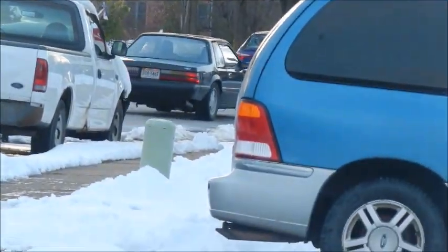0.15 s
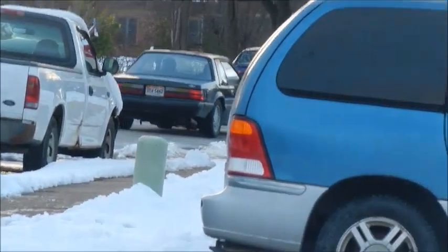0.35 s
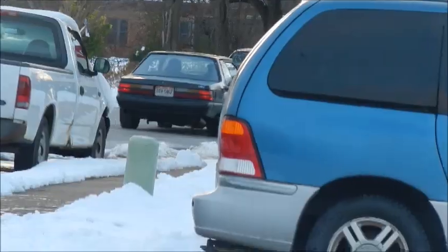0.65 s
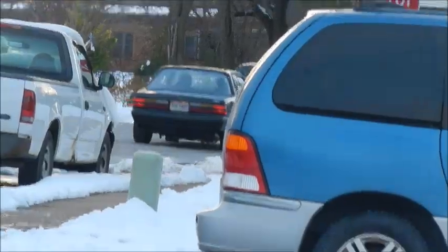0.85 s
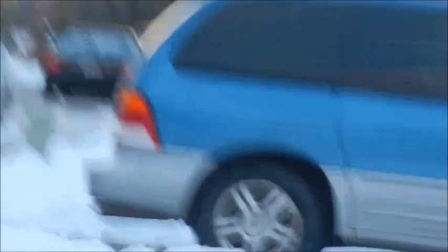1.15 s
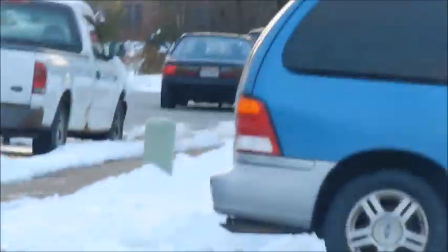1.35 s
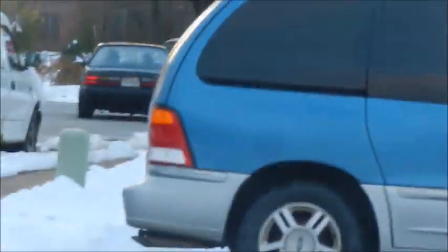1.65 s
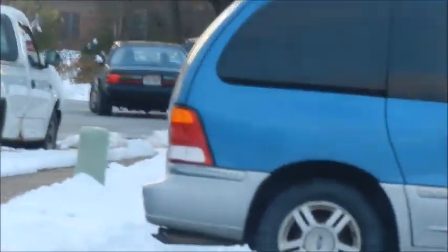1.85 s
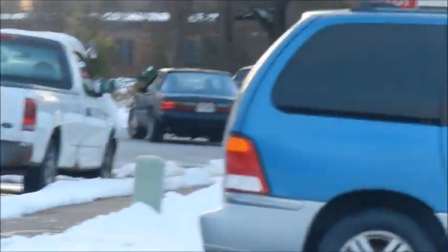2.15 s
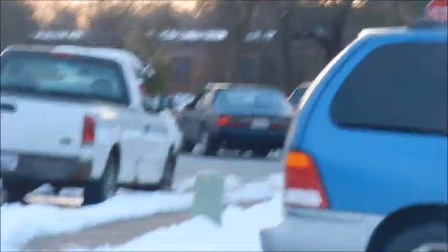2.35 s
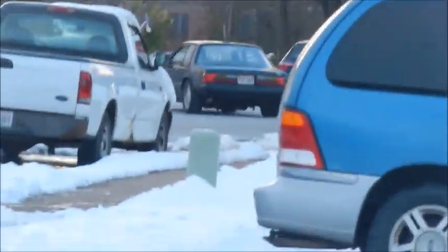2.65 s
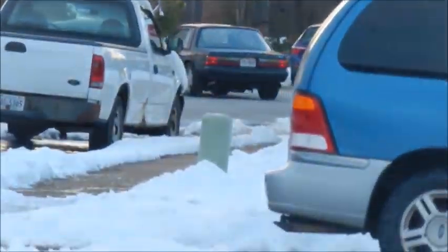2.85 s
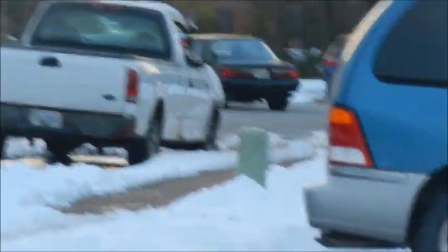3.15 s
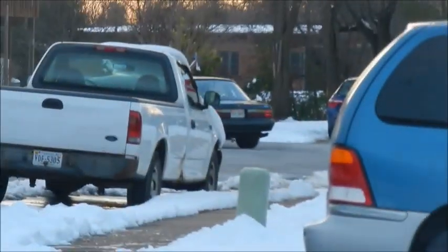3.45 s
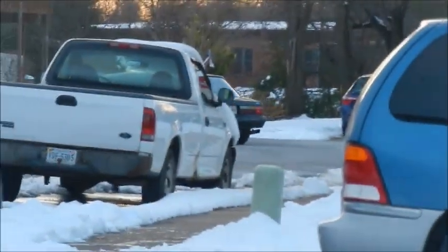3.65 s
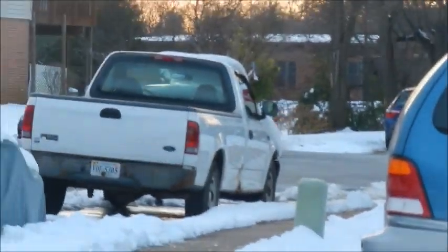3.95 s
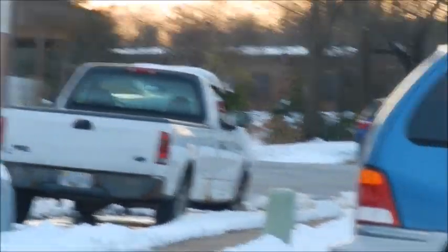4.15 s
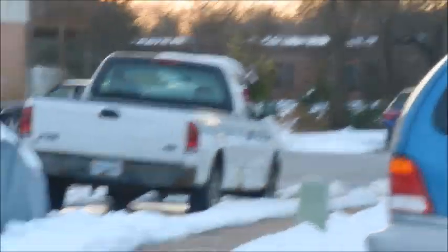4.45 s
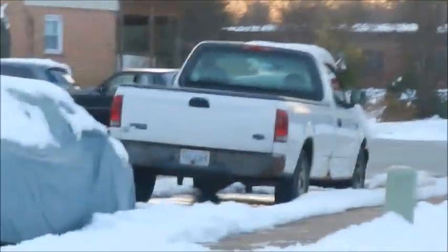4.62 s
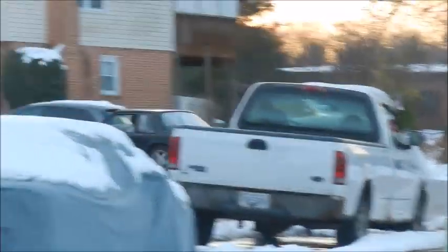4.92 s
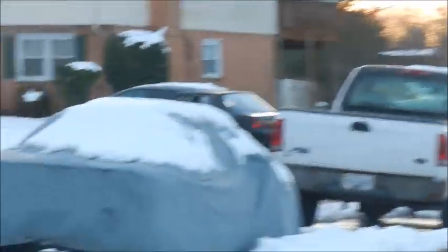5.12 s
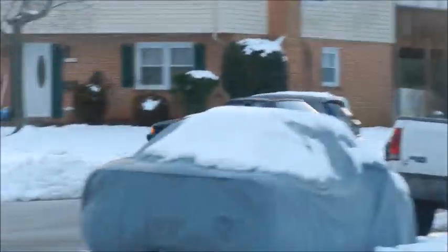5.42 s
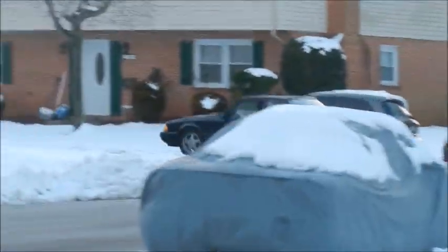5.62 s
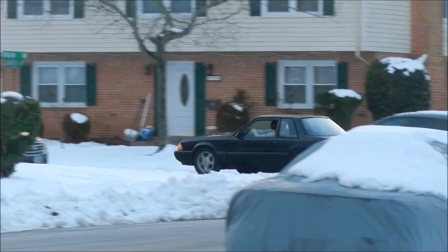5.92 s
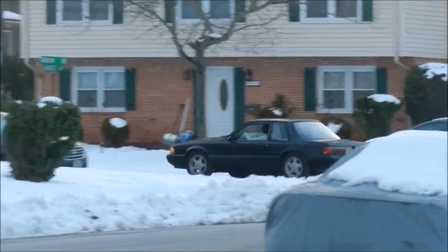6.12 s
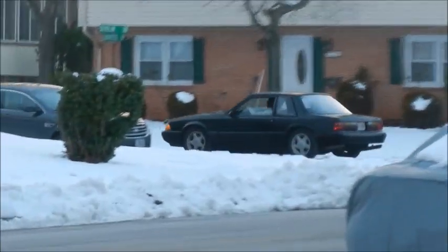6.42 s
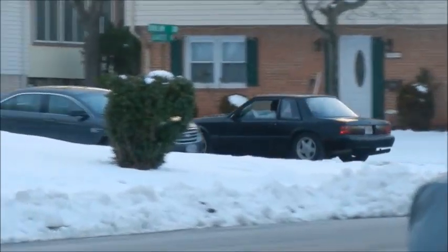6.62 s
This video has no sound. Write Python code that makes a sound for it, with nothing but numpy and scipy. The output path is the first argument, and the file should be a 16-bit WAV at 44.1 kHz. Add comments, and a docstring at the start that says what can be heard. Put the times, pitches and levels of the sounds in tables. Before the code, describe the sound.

Outdoors on a snowy residential street, a dark car rolls by at low speed with a lumpy, chugging eight-cylinder exhaust. Sharp little clicks and rubs come from a hand on the camera. The engine smooths, climbs steadily in pitch and swells into a deep resonant boom with rushing gas and raspy hiss, then the driver lifts off and the note falls. Faint street hiss lies beneath, and the car sits louder on the right.

```python
"""An uneven, loping eight-cylinder exhaust comes first; a faint hum rises through it and is gone.
The car rolls round a street corner, pulls away and lifts off: its firing note climbs into the exhaust boom.
Multiples of the engine cycle make note and burble; noise pulsed by the firings makes gas rush and rasping hiss.
Close by, a hand rubs and ticks on a camera, as uneven noise strokes and short struck resonances.
Steady banded noise is the faint hiss of the street."""
import sys
import numpy as np
from scipy import signal
from scipy.io import wavfile

SR = 44100
rng = np.random.default_rng(int(sys.argv[2]) if len(sys.argv) > 2 else 0)


def file_out(sig):
    """Save sig as 16-bit WAV at sys.argv[1]."""
    # one column per channel
    cols = np.atleast_2d(sig).T
    # limit, then scale
    lim = np.clip(cols, -1, 1)
    pcm = np.round(lim * 32767).astype(np.int16)
    wavfile.write(sys.argv[1], SR, pcm)


N = 298907   # length in samples


def from_db(db):
    """Decibels to amplitude gain."""
    return 10 ** (np.asarray(db) / 20)


def rms_one(x):
    """Scale a signal to rms 1."""
    return x / np.sqrt(np.mean(np.abs(x) ** 2) + 1e-20)


def in_time(rows):
    """Each column of a curve, one value a sample."""
    s, *columns = np.transpose(rows)
    return [np.interp(np.arange(N) / SR, s, c) for c in columns]


def at_hz(points, hz):
    """Each column of a spectrum, read on a log-frequency axis."""
    knots, *columns = np.transpose(points)
    return [np.interp(np.log(hz), np.log(knots), c) for c in columns]


def drift(rate_hz):
    """Slow random wandering with rms 1: noise through a two-pole lowpass, made at SR / 40."""
    r = np.exp(-80 * np.pi * rate_hz / SR)
    white = rng.standard_normal(N // 40 + 2002)
    slow = signal.lfilter([1], [1, -2 * r, r * r], white)[2000:]   # skip the filter's start
    return np.interp(np.arange(N) / 40, np.arange(len(slow)), rms_one(slow))


def resonance(x, hz, width_hz):
    """Two-pole resonance with gain 1 on top."""
    r = np.exp(-np.pi * width_hz / SR)
    zeros = np.array([1, 0, -1]) * (1 - r * r) / 2
    poles = [1, -2 * r * np.cos(2 * np.pi * hz / SR), r * r]
    return signal.lfilter(zeros, poles, x + 1e-18)


def pan(db):
    """Left and right gains for a level difference, positive to the left."""
    return from_db(np.array([[db], [-db]]) / 2)


def banded_noise(spectrum, ports, patchy_db):
    """Half-octave bands of stereo noise with their own flicker, likeness and balance; rms 1 in the middle."""
    out, edges = 0, 24 * 2 ** np.arange(0, 9.6, .5)
    white = rng.standard_normal((2, 2, N))
    for k, (low, high) in enumerate(zip(edges, edges[1:])):
        band_pass = signal.butter(2, [low, high], "band", fs=SR, output="sos")
        mid, side = signal.sosfilt(band_pass, white[k % 2])   # neighbouring bands use separate noise
        hz = np.sqrt(low * high)
        alike, balance_db = at_hz(ports, hz)
        alike = np.clip(alike, -.99, .99)
        stereo = np.sqrt(1 + alike) * mid + np.sqrt(1 - alike) * side * [[1], [-1]]
        flicker_db = patchy_db * drift(16.0)
        out = out + pan(balance_db) * stereo * from_db(at_hz(spectrum, hz)[0] + flicker_db)
    return out / np.std(out.mean(axis=0))


# engine speed: time_s, firing_rate_hz (firings per second)
ENGINE_SPEED = [(0, 84), (.2, 87), (.5, 84.5), (.8, 81), (1.0, 77.5), (1.2, 77), (1.4, 73.5), (1.75, 76.5),
                (2.05, 72.3), (2.25, 79), (2.5, 79.7), (2.68, 85.2), (2.95, 87.3), (3.25, 93), (3.55, 95.2),
                (3.8, 99.7), (4.0, 102.4), (4.2, 105.9), (4.6, 114.6), (5.05, 123.9), (5.22, 126.1),
                (5.4, 131.6), (5.58, 134.4), (5.76, 139.4), (5.95, 141.7), (6.33, 147.2), (6.5, 138.6),
                (6.62, 130), (6.7, 119), (6.78, 118)]
# the driver's foot and the unevenness of the cylinders: time_s, throttle (0-1), burble_db (before pipe colour)
THROTTLE_AND_BURBLE = [(0, 0.1, -24.5), (.8, 0.04, -32.5), (1.35, 0.12, -26.5), (1.7, 0.26, -26),
                       (3.2, 0.13, -28), (3.8, 0.5, -30), (4.5, 0.67, -24.5), (4.87, 0.57, -25),
                       (5.08, 0.84, -25.5), (5.3, 0.96, -20), (5.6, 0.88, -36), (6.35, 0.86, -29),
                       (6.48, 0.26, -24), (6.58, 0.25, -24), (6.78, 0.5, -26.5)]
WEAK_FIRING_S = 3.748   # one cylinder fires weakly here, and once in every cycle before and after


def engine():
    """Eight firings make one engine cycle; the running cycle count drives every pulse of the car."""
    cycle_hz = in_time(ENGINE_SPEED)[0] / 8
    cycle = np.cumsum(cycle_hz) / SR
    cycle = cycle - np.interp(WEAK_FIRING_S, np.arange(N) / SR, cycle)
    throttle, burble_db = in_time(THROTTLE_AND_BURBLE)
    return cycle, cycle_hz, np.clip(throttle, 0, 1), burble_db


# strength of the firing note ahead of the lope: time_s, level_db
FIRING_NOTE = [(0, -41.5), (.2, -46), (.5, -48), (.8, -50.5), (1.0, -42.5), (1.15, -47.5), (1.38, -41),
               (1.6, -49), (1.85, -31.5), (2.08, -44), (2.25, -39), (2.6, -37.5), (3.3, -37.5),
               (3.95, -36.5), (4.2, -39.5), (4.55, -33.5), (4.8, -34), (5.0, -29), (5.2, -25.5),
               (5.4, -24.5), (5.6, -24.5), (5.95, -24), (6.28, -28), (6.42, -30), (6.6, -29), (6.7, -43.5),
               (6.78, -33)]
# relative strength of the other multiples of the cycle (the eighth is set by FIRING_NOTE): multiple, level_db
CYCLE_MULTIPLES = [(3, -22), (4, -13), (5, -13.5), (6, -14), (7, -21), (8, 0), (9, -23), (10, -6.5),
                   (11, -15), (12, -20), (13, -17), (14, -17), (15, -24), (16, -20.5), (17, -31), (18, -29),
                   (19, -40), (20, -33), (21, -32), (22, -24.5), (23, -29), (24, -22), (25, -27), (26, -32),
                   (27, -27.5), (28, -30), (29, -35), (30, -26), (32, -24), (34, -38), (36, -34), (38, -27),
                   (40, -26), (42, -36), (44, -38), (46, -27), (48, -21), (50, -33)]
# boom response of pipes and mufflers: pitch_hz, gain_db
PIPE_LOW = [(25, -34), (45, -24), (52, -22), (58, -12.5), (63, -12.5), (69, -13), (77, -13), (92, -18),
            (105, -17), (118, -6), (128, -3), (140, 0), (149, -13.5), (157, -41), (178, -33)]
# upper response of pipes and mufflers: pitch_hz, gain_db
PIPE_HIGH = [(215, -25), (228, -16), (239, -1), (250, -.5), (264, 1.5), (290, -3), (320, -18), (345, -14),
             (372, 4), (400, -2), (440, -6), (470, -12), (505, -3), (570, -19), (640, -12), (700, -15),
             (765, -8), (850, -16), (1000, -17)]
RASP_DB, RASP_THROTTLE_DB = -46, 18.5   # upper lines before pipe colour, throttle shut; gain at full throttle
RASP_ROUGH, RASP_FADE_DB, RASP_FADE_HZ = .17, 1.6, 2.2   # upper lines flutter, and swell and fade one by one
STUMBLE_ROUGH, STEADY_AT_S, STEADYING_S = 0.37, 3.27, 0.84   # firings stumble until the engine is under load


def exhaust(cycle, cycle_hz, throttle, burble_db, note_rough, burble_rough):
    """Every multiple of the engine cycle sweeps through the pipe response; the eighth is the firing note."""
    rasp_db = RASP_DB + RASP_THROTTLE_DB * throttle
    stumble = STUMBLE_ROUGH * np.clip((STEADY_AT_S - np.arange(N) / SR) / STEADYING_S, 0, 1)
    multiples, strengths_db = np.transpose(CYCLE_MULTIPLES)
    boom, rest = 0, 0
    for k in range(3, 57):
        hz = k * cycle_hz
        upper = np.clip((hz - 160) / 70, 0, 1)   # sharper pulses under load feed the upper resonances
        if k == 8:
            level_db, rough = in_time(FIRING_NOTE)[0], note_rough + stumble
        else:
            pipe_db = at_hz(PIPE_LOW + PIPE_HIGH, hz)[0]
            colour_db = np.interp(k, np.round(multiples), strengths_db) + pipe_db
            fading_rasp_db = rasp_db + RASP_FADE_DB * drift(RASP_FADE_HZ)
            level_db = (1 - upper) * burble_db + upper * fading_rasp_db + colour_db
            rough = (1 - upper) * burble_rough + upper * RASP_ROUGH + stumble
        # no two cycles burn alike, so each line wanders in strength and phase; its rms is kept
        wander = 1 + rough * (drift(6) + 1j * drift(6))
        wander = wander * np.sqrt(2 / (1 + 2 * rough ** 2))
        # the weak cylinder's multiples fall together against the firing note and cut one gap a cycle
        scatter = rng.random()
        turn = 0 if k == 8 else .5 if 8 < k < 15 else scatter
        line = from_db(level_db) * wander * np.exp(2j * np.pi * (k * cycle + turn))
        in_boom = np.clip((hz - 95) / 15, 0, 1) * (1 - upper)
        boom = boom + in_boom * line
        rest = rest + (1 - in_boom) * line
    return np.real(rest + lope(boom))


# single strong chugs of the loping engine: peak_s, peak_db, ring_hz
LOPING_CHUGS = [(0.178, -38, 129), (0.269, -47, 123), (0.377, -45, 128), (0.442, -38, 122),
                (.562, -32, 129), (0.698, -38.5, 125), (.758, -36, 125.4), (.889, -34, 119),
                (.956, -38.5, 119), (1.069, -34, 131), (1.265, -32, 121), (1.404, -36.5, 136),
                (1.473, -32.5, 121), (1.614, -39.5, 130), (1.685, -33, 125), (1.791, -34.5, 123),
                (1.896, -33, 122), (2.001, -40, 120), (2.115, -35, 116), (2.219, -40.5, 121)]
LOPE_END_S, LOPE_FADE_S, LOPE_SAG_DB, CHUG_WIDTH_S = 2.8, 0.24, -3, 0.027


def lope(boom):
    """At low speed the boom sags and each chug makes the muffler swell and ring; the sag then fades out."""
    t = np.arange(N) / SR
    sag = from_db(LOPE_SAG_DB * np.clip((LOPE_END_S - t) / LOPE_FADE_S, 0, 1))
    chugs = 0
    for s, db, hz in LOPING_CHUGS:
        swell = np.exp(-((t - s) / CHUG_WIDTH_S) ** 2)
        chugs = chugs + from_db(db) * swell * np.cos(2 * np.pi * hz * (t - s))
    return sag * boom + chugs


NOTE_PAN_DB = -9.6   # left minus right


def from_car(x):
    """Two microphone ports hear the car in opposite polarity, louder on the right; the middle keeps the level."""
    ports = pan(NOTE_PAN_DB) * [[-1], [1]]
    return x * ports / ports.mean()


# colour of the gas rush: pitch_hz, relative density_db (per Hz)
RUSH_SPECTRUM = [(30, -7.5), (70, 7), (130, 4), (190, -1.5), (260, 2.5), (400, -5), (570, -2), (800, -7),
                 (1150, -5.5), (1650, -17), (2100, -7.5), (3000, -24), (5000, -31), (12000, -44)]
# how the two ports hear the car's noise: pitch_hz, left_right_likeness (-1 to 1), left_minus_right_db
CAR_PORTS = [(60, -0.44, -8), (248, -0.56, -9), (486, -0.98, -10), (1000, -0.83, -9), (2020, -0.65, -6.5),
             (4240, -0.43, -1.5), (12000, -0.56, 0)]
# tailpipe resonances added to the rush: pitch_hz, width_hz, gain_db
TAILPIPE_MODES = [(378, 55, -8), (500, 40, -7), (765, 50, -5), (930, 120, -10)]
IDLE_HZ = 77   # firing rate when rolling slowly
RUSH_IDLE_DB, RUSH_DB_PER_OCTAVE, RUSH_THROTTLE_DB = -52, 3, 3   # before the tailpipes ring
CORNER_S, CORNER_WIDTH_S, CORNER_DB = 4.32, 0.64, 2   # swells a little as the car swings out of the corner


def rush(cycle, cycle_hz, throttle, throb):
    """Gas leaves the tailpipes in a puff at each firing and rings in them, louder with speed and throttle."""
    octaves = np.log2(8 * cycle_hz / IDLE_HZ)
    corner = np.exp(-((np.arange(N) / SR - CORNER_S) / CORNER_WIDTH_S) ** 2)
    engine_db = RUSH_DB_PER_OCTAVE * octaves + RUSH_THROTTLE_DB * throttle
    level_db = RUSH_IDLE_DB + engine_db + CORNER_DB * corner
    puffs = 1 + throb * np.cos(2 * np.pi * 8 * cycle)
    gas = from_db(level_db) * puffs * banded_noise(RUSH_SPECTRUM, CAR_PORTS, patchy_db=1.5)
    return gas + sum(from_db(db) * resonance(gas, hz, width) for hz, width, db in TAILPIPE_MODES)


# the rasping hiss, which comes in as the car pulls round the corner: time_s, level_db
HISS_LEVEL = [(0, -73), (1.95, -85), (2.22, -61), (2.4, -68), (2.8, -61.5), (3.7, -63), (4.4, -60),
              (4.95, -57.5), (5.4, -60), (6.3, -62.5), (6.78, -80)]
# resonances of the hiss: pitch_hz, width_hz, relative gain_db
HISS_RESONANCES = [(1450, 350, 0), (1730, 230, 2.5), (3250, 600, -11)]


def hiss(cycle, throb, grain_db):
    """Noise rings in a few narrow resonances, in one puff of uneven strength per firing."""
    firings = 8 * cycle
    strength = from_db(grain_db * rng.standard_normal(1000))[firings.astype(int)]
    puffs = strength * (1 - throb * np.cos(2 * np.pi * firings))
    source = banded_noise([(1000, 0), (4000, 0)], CAR_PORTS, patchy_db=1.0) * puffs
    rung = 0
    for k, (hz, width, db) in enumerate(HISS_RESONANCES):
        twice = resonance(resonance(source, hz, width), hz, width)
        rung = rung + (-1) ** k * from_db(db) * twice   # alternating signs join neighbours into one band
    return from_db(in_time(HISS_LEVEL)[0]) * rung / np.std(rung.mean(axis=0))


# a faint hum that rises and is gone: time_s, pitch_hz, level_db (before its waver)
HUM_GLIDE = [(0, 233.4, -59), (.53, 242.5, -59.5), (.6, 291.4, -56), (.75, 292, -120)]


def hum(rough):
    """One gliding sine whose strength wavers at random."""
    hz, db = in_time(HUM_GLIDE)
    waver = 1 + rough * drift(4.9)
    return from_db(db) * waver * np.sqrt(2) * np.sin(2 * np.pi * np.cumsum(hz) / SR)


# ticks of the camera body, levels before panning:
# start_s, crack_peak_db, crack_top_hz, knock_hz, knock_db, ring_hz, ring_db, ring_t60_s
CAMERA_TICKS = [(1.0465, -40, 15000, 1300, -50, 2200, -54, .02),
                (1.0915, -38, 11000, 1300, -48, 2700, -48, .02),
                (1.1105, -34, 15000, 1300, -52, 2200, -49, .02),
                (1.124, -32, 15000, 1900, -36, 2200, -42, .025),
                (1.129, -39, 9000, 1900, -39, 2700, -48, .02),
                (1.1597, -39, 9000, 2000, -38, 2180, -45, .02),
                (1.2665, -27, 15500, 650, -31, 2300, -38, .035),
                (1.4957, -25.5, 11400, 1350, -42, 4200, -41, .025),
                (4.481, -40, 15000, 1200, -46, 1200, -50, .02),
                (4.535, -43, 11000, 2500, -41, 2400, -41.5, .09),
                (5.691, -35, 13000, 1000, -38, 2950, -37.5, .05),
                (6.322, -44, 6000, 800, -32, 1200, -42, .04)]
# modes of the camera shell: pitch_hz, width_hz, relative gain_db
SHELL_MODES = [(1400, 400, 1), (2900, 650, 4), (4600, 650, 0), (6800, 1800, -7), (10600, 2200, -2),
               (13500, 2500, -9)]
TICK_PAN_DB = -4.0   # left minus right
KNOCK_CYCLES = 5   # the knock falls 60 dB in this many cycles


def ticks(crack_lag_s, tail_db, tail_s, ring_width_hz):
    """A sharp crack through the camera shell with a short rattle, a dull knock and one narrow ring."""
    out, t = np.zeros((2, N)), np.arange(SR // 8) / SR
    snap = np.zeros((2, len(t)))
    snap[0, 0] = snap[1, round(crack_lag_s * SR)] = 1   # the right hears it a moment later
    for s, crack_db, top_hz, knock_hz, knock_db, ring_hz, ring_db, t60 in CAMERA_TICKS:
        grit = rng.standard_normal((2, len(t)))
        contact = snap + grit * from_db(tail_db) * np.exp(-t / tail_s)
        crack = 0
        for k, (hz, width, db) in enumerate(SHELL_MODES):
            crack = crack + (-1) ** k * from_db(db) * resonance(contact, hz, width)
        low_pass = signal.butter(8, min(top_hz, CUTOFF_HZ), fs=SR, output="sos")
        crack = signal.sosfilt(low_pass, crack)
        crack = from_db(crack_db) * crack / np.abs(crack).max()
        knock = from_db(-60 * t * knock_hz / KNOCK_CYCLES) * np.cos(2 * np.pi * knock_hz * t)
        ring = resonance(resonance(grit, ring_hz, ring_width_hz), ring_hz, ring_width_hz)
        ring = rms_one(ring) * from_db(-60 * t / t60)
        at = round(s * SR)
        out[:, at:at + len(t)] += crack + from_db(knock_db) * knock + from_db(ring_db) * ring
    return out * pan(TICK_PAN_DB)


# strokes of the hand on the camera: start_s, length_s, level_db (before grain and snags)
RUB_STROKES = [(1.062, 0.13, -63), (1.1, 0.018, -65), (1.174, 0.024, -57), (1.264, 0.0092, -50),
               (1.486, .014, -54.5), (1.854, 0.033, -66), (2.385, 0.14, -65.5), (4.067, 0.12, -65),
               (4.79, 0.052, -62.5), (5.453, 0.028, -63), (6.29, 0.026, -64), (6.34, 0.13, -57.5),
               (6.506, 0.14, -57.5)]
# colour of the rubbing: pitch_hz, relative density_db (per Hz)
RUB_SPECTRUM = [(800, -2.5), (2200, 4.5), (4500, -2.5), (8000, 0.5), (11500, -3), (15500, -1)]
# stereo image of the rubbing: pitch_hz, left_right_likeness (-1 to 1), left_minus_right_db
RUB_IMAGE = [(1000, -0.28, -12.5), (4000, -0.45, -1.5), (12200, -0.17, 3.5)]
RUB_ATTACK_DB_PER_S, RUB_RELEASE_DB_PER_S = 380, 402
SNAGS_PER_S, SNAG_S, SNAG_DB = 60, .001, 6   # mean rate, decay time, gain of the added burst before a random 0-1


def rubbing(grain_db, grain_hz, stutter_db, stutter_hz):
    """Skin slides in tiny uneven slips and now and then snags; each stroke rises, holds and dies away."""
    slide, t = banded_noise(RUB_SPECTRUM, RUB_IMAGE, patchy_db=.5), np.arange(N) / SR
    strokes = 0
    for s, length, db in RUB_STROKES:
        rise_db = RUB_ATTACK_DB_PER_S * np.maximum(s - t, 0)
        fall_db = RUB_RELEASE_DB_PER_S * np.maximum(t - s - length, 0)
        strokes = strokes + from_db(db - rise_db - fall_db)
    catches = (rng.random(N) < SNAGS_PER_S / SR) * rng.random(N)
    snags = signal.lfilter([1], [1, -np.exp(-1 / (SNAG_S * SR))], catches + 1e-18)
    slips = from_db(grain_db * drift(grain_hz) + stutter_db * drift(stutter_hz))
    return strokes * slips * (1 + from_db(SNAG_DB) * snags) * slide


# colour of the street hiss: pitch_hz, relative density_db (per Hz)
STREET_SPECTRUM = [(30, 13), (100, 10), (190, 23.5), (270, 18.5), (400, 19.5), (1000, 2.5), (2500, 6),
                   (4500, 2.5), (8000, -4.5), (11000, -3.5), (15500, -5.5)]
# stereo image of the street: pitch_hz, left_right_likeness (-1 to 1), left_minus_right_db
STREET_IMAGE = [(100, -0.67, -10), (1000, -0.42, 8), (3960, -0.36, -1), (12000, -0.15, 1.5)]


def street(level_db):
    """A faint bed of noise whose bands flicker slightly."""
    return from_db(level_db) * banded_noise(STREET_SPECTRUM, STREET_IMAGE, patchy_db=1.5)


def scene():
    """The car, the hand on the camera and the street."""
    cycle, cycle_hz, throttle, burble_db = engine()
    tones = exhaust(cycle, cycle_hz, throttle, burble_db, note_rough=.06, burble_rough=.14)
    car = from_car(tones + hum(rough=0.79))
    car = car + rush(cycle, cycle_hz, throttle, throb=0.089)
    car = car + hiss(cycle, throb=.4, grain_db=1.5)
    taps = ticks(crack_lag_s=.00002, tail_db=-25, tail_s=.011, ring_width_hz=1000)
    hand = taps + rubbing(grain_db=1.5, grain_hz=120, stutter_db=1.2, stutter_hz=12)
    return car + hand + street(level_db=-57.5)


CUTOFF_HZ = 15600   # top of the whole sound, and the highest top of a tick's crack


def record(dry):
    """A steep elliptic lowpass cuts the top."""
    low_pass = signal.ellip(12, .1, 90, CUTOFF_HZ, fs=SR, output="sos")
    return signal.sosfilt(low_pass, dry)


dry = scene()
out = record(dry)
file_out(out)
```